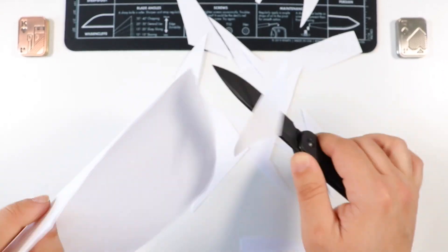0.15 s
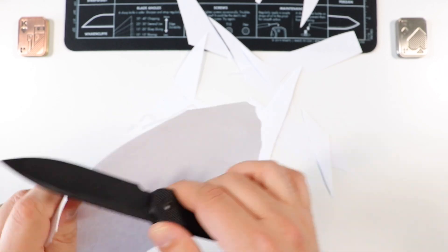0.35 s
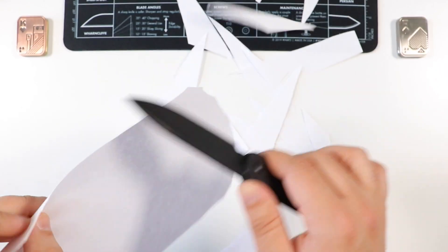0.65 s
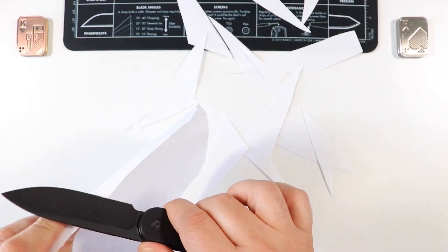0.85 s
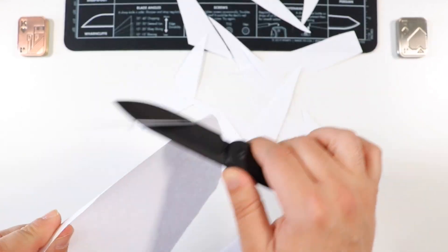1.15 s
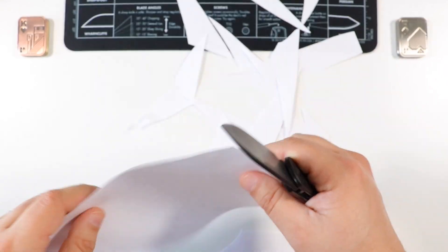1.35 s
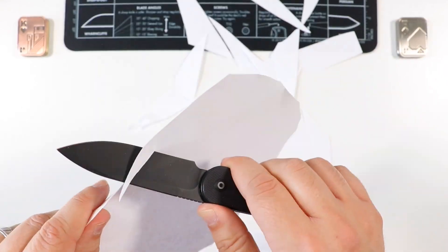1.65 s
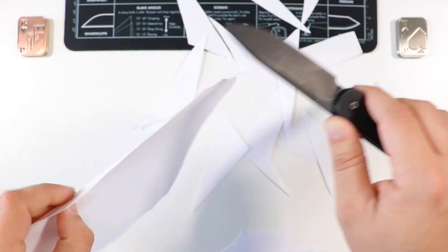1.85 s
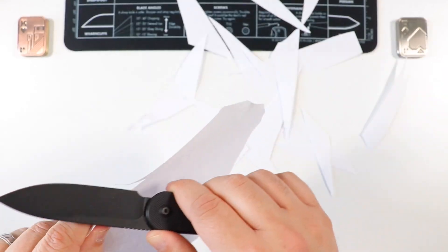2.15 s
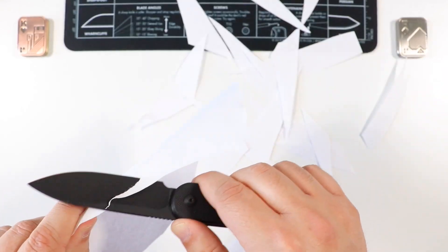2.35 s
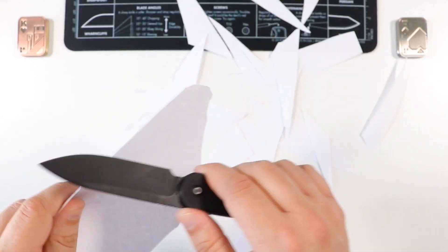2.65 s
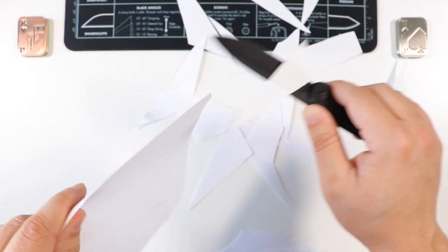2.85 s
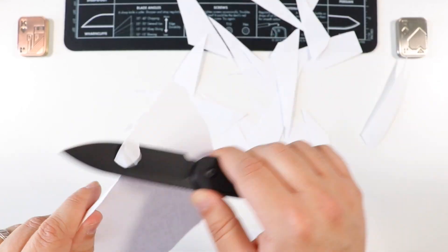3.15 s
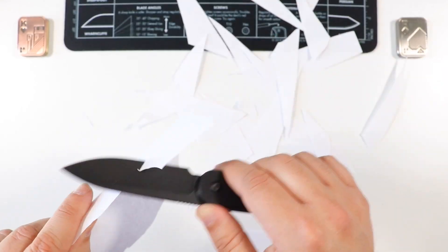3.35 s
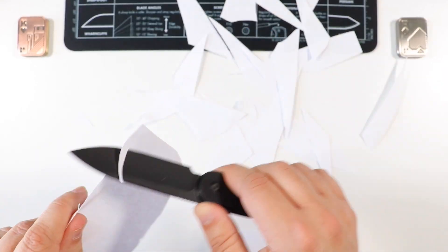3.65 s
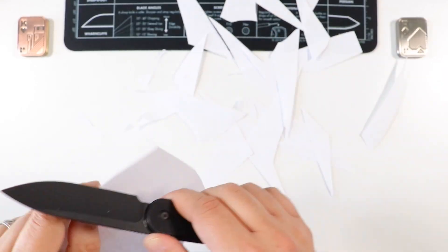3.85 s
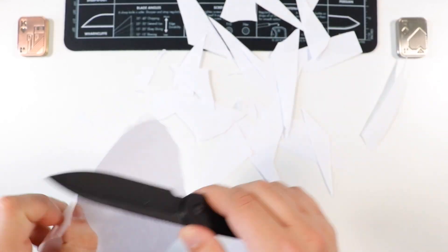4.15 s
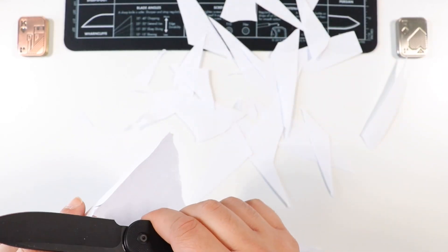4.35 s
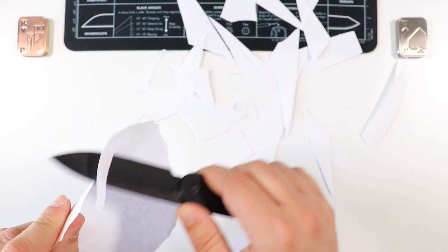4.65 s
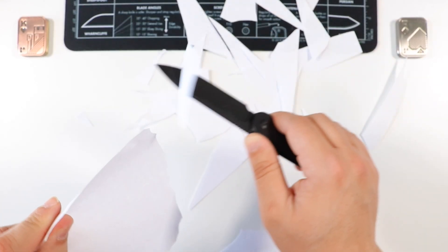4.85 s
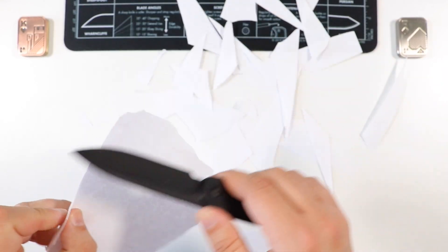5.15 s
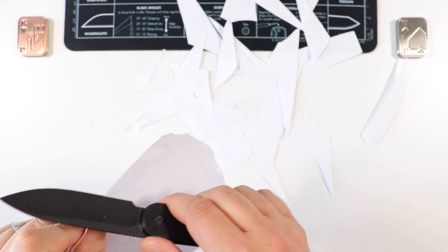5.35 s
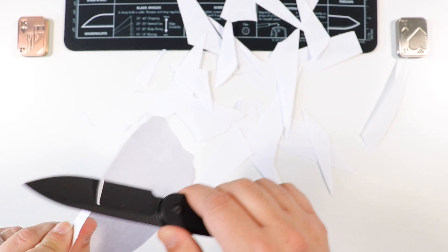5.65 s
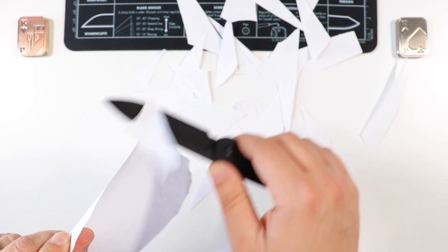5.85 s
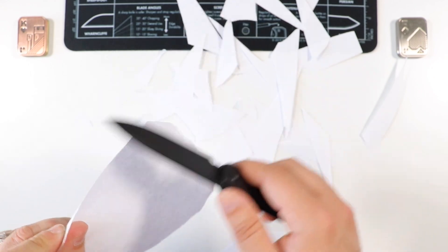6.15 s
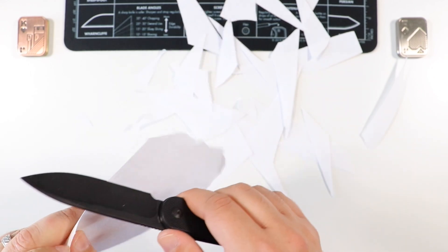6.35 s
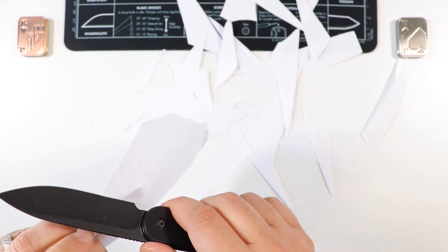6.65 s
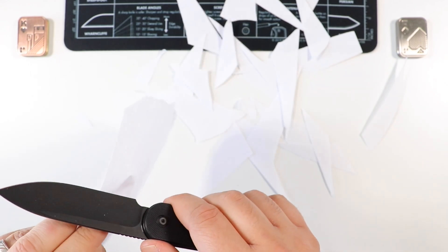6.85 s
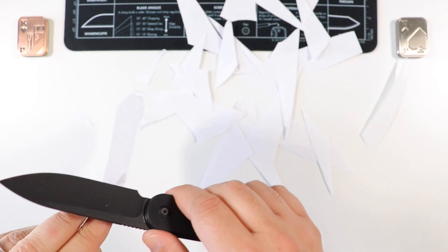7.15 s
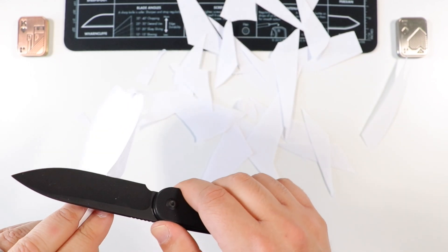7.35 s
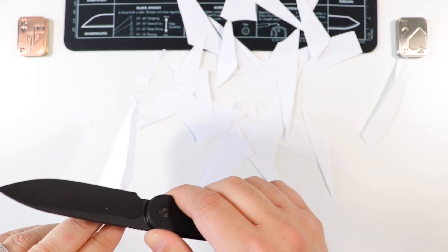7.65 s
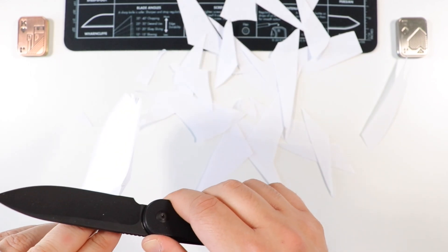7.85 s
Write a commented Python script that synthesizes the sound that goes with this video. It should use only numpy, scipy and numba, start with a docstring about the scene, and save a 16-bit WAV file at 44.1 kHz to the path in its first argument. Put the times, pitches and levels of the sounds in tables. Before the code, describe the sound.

Close, dry rasps of a knife blade cutting paper again and again, while the hand-held sheet rustles and snaps between strokes.

```python
"""A knife is drawn again and again through a sheet of paper held over a table, close under a microphone.
Over the hum of a quiet room, short cuts follow one another for four seconds: parting fibres crackle and
ring the sheet, which rustles while creases snap and hands thump softly on the table.
The two longest, loudest cuts come at 4.5 s and 5.5 s, each ending in a burst. The paper then only
rustles and snaps, until a few lighter cuts begin at 7.1 s."""
import sys
import numpy as np
from scipy import signal
from scipy.fft import rfft, irfft
from scipy.io import wavfile
from scipy.ndimage import uniform_filter1d
from numba import njit

SR = 44100
rng = np.random.default_rng(int(sys.argv[2]) if len(sys.argv) > 2 else 0)


def inscribe(sig):
    """Save sig as 16-bit PCM at rate SR to the path in sys.argv[1].

    A 1-D sig is mono; a 2-D sig holds one channel per row.
    Samples are clipped to [-1, 1] before scaling.
    """
    pcm = np.round(np.clip(np.atleast_2d(sig).T, -1, 1) * 32767)
    wavfile.write(sys.argv[1], SR, pcm.astype(np.int16))


N = 353152

# Resonance bands of the paper: f/Hz, bandwidth/Hz, level/dB
FLAT_MODES = [(2240, 760, -3.5), (2970, 930, -4), (3980, 1150, -3.5)]  # flat part of the sheet: a rasp
CURVED_MODES = [(900, 490, -0.5), (1257, 406, 4), (1595, 440, 4.5)]  # curved part: a hollow ring
EDGE_MODES = [(5300, 1120, -3), (6480, 1240, 0.5), (7380, 1900, -4.5)]  # cut edge: a hiss
FIZZ_BANDS = [(10300, 5900, 0), (12700, 3700, -3), (15200, 1480, -19)]  # finest fibres: a fizz
AIR_MODES = [(155, 124, -15), (229, 75, -11), (362.7, 41.6, 0.5), (528.5, 40, 1.5), (668, 180, 2.5)]  # air between sheet and table: a low flap


def undb(db):
    """Amplitude ratio of a level; undb(2 * db) is the power ratio."""
    return 10 ** (np.asarray(db) / 20)


def unit(x):
    """Normalisation to rms 1."""
    return x / np.sqrt(np.mean(x ** 2))


def wander(rate_hz):
    """Slow random modulation: Gaussian steps smoothed twice, with a spread near 1."""
    hold = int(SR / rate_hz)
    steps = np.repeat(rng.standard_normal(N // hold + 1), hold)
    return 1.146 * uniform_filter1d(uniform_filter1d(steps, hold), hold)[:N]


@njit
def resonator(x, hz, width_hz):
    """Second-order resonance: a state-variable band-pass with gain 1 at its moving centre."""
    y, band_state, low_state = np.empty(len(x)), 0., 0.
    for i in range(len(x)):
        g, damping = np.tan(np.pi * hz[i] / SR), width_hz / hz[i]
        band = (band_state + g * (x[i] - low_state)) / (1 + g * (g + damping))
        band_state = 2 * band - band_state
        low_state += 2 * g * band
        y[i] = damping * band
    return y


def ring(force, modes, drift, flicker_db):
    """Modal superposition: resonances wander in frequency and strength as the sheet bends."""
    out = 0
    for hz, width_hz, db in modes:
        centre_hz = np.clip(hz * (1 + drift * wander(25)), 20, .45 * SR)
        patch = force * rng.choice([-1., 1.], N)  # random signs make the modes incoherent
        stage_hz = 1.63 * width_hz  # two stages in series narrow the band again
        band = resonator(resonator(patch, centre_hz, stage_hz), centre_hz, stage_hz)
        out = out + undb(db + flicker_db * wander(60)) * band / np.sqrt(width_hz)
    return out


def room_hum():
    """Spectral shaping turns white noise into the hum and hiss of the room; its level flickers gently."""
    # Background spectrum: f/Hz, relative spectrum level/dB
    spectrum = [(59, -31), (100, -9), (176, -6), (330, -8.5), (733, -16.5), (3390, -23.5), (10100, -28),
                (13800, -32), (15000, -27)]
    hz, db = np.transpose(spectrum)
    f = np.arange(N // 2 + 1) * SR / N + 1
    gain = undb(np.interp(np.log(f), np.log(hz), db))
    noise = unit(irfft(rfft(rng.standard_normal(N)) * gain, N))
    return noise * undb(-59 + 0.76 * wander(5))


def rumble_and_thumps():
    """Amplitude modulation of deep noise: a slow rumble, plus a Gaussian pulse of power for each thump."""
    # Course of the rumble: t/s, level/dB
    rumble = [(0.0, -65), (1.6, -70), (2.6, -70.5), (4.7, -67), (5.3, -62), (5.8, -75), (6.1, -62),
              (8.01, -62.5)]
    # Hands meeting the table: t/s, peak level/dB
    thumps = [(.13, -61), (.58, -60), (1.11, -66), (1.31, -57), (2.56, -62), (2.97, -69), (3.32, -56),
              (4.5, -58), (5.06, -56), (5.4, -59), (5.6, -61), (6.29, -55), (6.42, -57), (7.36, -63)]
    rise_s, fall_s = 0.045, 0.046
    t = np.arange(N) / SR
    power = undb(2 * np.interp(t, *np.transpose(rumble)))
    for peak_s, db in thumps:
        from_peak = np.maximum((peak_s - t) / rise_s, (t - peak_s) / fall_s)
        power += undb(2 * db) * np.exp(-from_peak ** 2)
    deep = resonator(rng.standard_normal(N), hz=np.full(N, 80.), width_hz=80.)
    deep = signal.sosfilt(signal.butter(2, 120, fs=SR, output="sos"), deep)
    return unit(deep) * np.sqrt(power)


def stroke_levels():
    """Incoherent strokes add in power: returns their level, then curved, edge, fizz, air shares in dB."""
    # Both tables: start t/s, rise/s, hold/s, fall/s (per 30 dB or so), level/dB, swell over the hold/dB,
    # curved share/dB, edge share/dB, air share/dB
    cuts = [(.034, 0.014, 0.1, 0.039, -29, -1, -7.5, -2, -11.5),
            (.42, 0.018, 0.16, 0.033, -31.5, 4, -5.5, -4.5, -8.5),
            (.848, 0.011, 0.014, 0.025, -36, 2, -11, -2.5, -9),
            (1.05, 0.017, .13, 0.093, -30.5, 2.5, -4.5, -6, -12.5),
            (1.555, 0.026, .03, 0.034, -30.5, 2, -4.5, -5.5, -12.5),
            (1.632, .028, .005, 0.078, -25.5, -1.5, -7, -5.5, -13),
            (1.69, 0.032, 0.024, 0.039, -27, -3.5, -5.5, -3.5, -13),
            (1.755, 0.018, 0.045, 0.053, -29.5, -1.5, -6, -4.5, -8),
            (2.02, 0.036, 0.071, 0.038, -35, 5.5, -3.5, -4.5, -16.5),
            (2.37, 0.029, 0.13, 0.065, -29.5, 1.5, -5, -7, -17.5),
            (2.735, 0.052, 0.056, 0.1, -30, 3, -5, -5.5, -18),
            (3.07, 0.081, 0.066, 0.028, -29.5, 0.5, -5.5, -3.5, -13.5),
            (3.33, .06, 0.046, 0.046, -28.5, -2.5, -8.5, -3.5, -19),
            (3.63, 0.016, 0.051, 0.11, -33.5, 6, -5.5, -4, -11),
            (3.71, 0.0425, .004, .02, -26.5, 0, -3, -5, -20),
            (3.975, 0.027, 0.068, 0.1, -30, 1, -7.5, -3, -15),
            (4.505, 0.024, 0.23, 0.063, -21, -2.5, -8.5, -3, -16),
            (5.5, 0.093, 0.23, .05, -23, 2, -6.5, -2, -16.5),
            (7.135, 0.011, 0.052, 0.072, -32.5, 1.5, -1.5, -8, -9),
            (7.272, 0.019, 0.025, 0.081, -30.5, 2, -4, -5, -7),
            (7.87, 0.028, 0.06, .09, -32.5, 1, -7, -2, -11),
            (7.96, .04, .02, .05, -31.5, 4, -5.5, -3.5, -8.5)]  # the blade drawn through the sheet
    # Rustles of the sheet, plus short loud bursts at snaps and at the ends of the long cuts
    rustles = [(-.01, 0.012, .008, 0.026, -36, -4.5, 2, -17, -2),
               (.15, 0.024, 0.037, 0.1, -34, -4, -3, -9.5, -4.5),
               (.265, 0.0091, .004, 0.052, -33.5, 1.5, -0.5, -13.5, -5.5),
               (.3, 0.016, 0.016, 0.13, -48.5, -0.5, -10, -2, -6),
               (.395, .012, .01, .03, -50, 0, -2, -14, 1),
               (.6, 0.025, 0.048, .06, -38.5, -2.5, -3.5, -6, -4.5),
               (.68, 0.018, 0.086, 0.15, -42.5, 1.5, -4.5, -5.5, -5.5),
               (.9, .02, 0.091, .02, -43, 8, -3.5, -6.5, -9), (1.24, .015, .015, .03, -44, -1, -4, -8, 0),
               (1.297, 0.028, .004, 0.047, -27, 0, -7.5, -22, -11),
               (1.384, .015, .03, 0.029, -34, -1, -4, -9, -4.5),
               (1.525, 0.018, 0.023, .03, -51, 2, -9, -9, -7),
               (1.85, 0.022, 0.019, 0.14, -41.5, -1.5, -5, -4.5, -6),
               (1.92, 0.015, 0.038, 0.12, -42, 2, -4.5, -9.5, -5),
               (2.15, .013, 0.025, .1, -42, -0.5, -6, -5, -13),
               (2.2, 0.024, 0.023, .04, -44, 6, -3, -7.5, -9.5),
               (2.26, .012, .08, .035, -43.5, 5, -2.5, -8, -13),
               (2.54, 0.016, 0.068, 0.16, -41.5, -3, -8.5, -4.5, -3.5),
               (2.635, 0.01, 0.046, 0.033, -42.5, -4, -3.5, -6.5, -4.5),
               (2.87, 0.034, .04, .04, -43.5, -1.5, -4, -2.5, -7),
               (2.94, 0.021, 0.033, 0.041, -40.5, 4, -2.5, -8, -6),
               (3.25, 0.018, .004, 0.15, -40, -4, -2.5, -15, -2.5),
               (3.325, .015, .03, .04, -39.5, 1, -4, -8, -14),
               (3.45, 0.022, .13, 0.023, -41.5, -5, -5.5, -6, -5.5),
               (3.765, 0.017, 0.043, 0.066, -44, -3.5, -6.5, -4.5, -3.5),
               (3.83, 0.021, 0.049, .025, -45, 0, -4.5, -6, -1.5),
               (3.93, 0.039, .002, .016, -36, -2, -4.5, -10, -1.5),
               (4.165, .03, 0.047, .08, -41.5, -4, -4.5, -5, -5),
               (4.255, .017, 0.0032, 0.042, -44, 0, -4, -23, 3.5),
               (4.28, 0.013, 0.066, .02, -37.5, -8.5, -6.5, -3.5, -18),
               (4.37, .01, 0.051, .05, -59, 1, -2, -9, -3), (4.44, .007, 0.063, .03, -47, 9, -3.5, -5, -11),
               (4.506, 0.0022, 0.0044, 0.019, -16, -4, 0, -14, -8.5),
               (4.72, 0.039, 0.0087, 0.036, -21, -1, -4, -6.5, -18),
               (4.805, 0.013, 0.013, 0.25, -31, -3.5, -5, -7.5, -6.5),
               (4.93, .028, 0.06, 0.29, -40.5, 4, -8, -3, -7),
               (5.175, 0.025, 0.11, 0.093, -42.5, 2.5, -7.5, -1, -3.5),
               (5.345, 0.016, .004, 0.24, -40.5, 0, -2, -8, -8),
               (5.485, 0.034, .04, .05, -46, 0, -4, -0.5, -12),
               (5.83, 0.03, 0.011, .04, -23, 2.5, -3.5, -7, -12),
               (5.905, 0.016, 0.043, 0.38, -30, -9, -6, -11.5, -3),
               (6.13, 0.015, 0.039, 0.12, -47.5, 0, -6, -0.5, -11),
               (6.185, 0.024, .12, 0.054, -43.5, 0.5, -8, -1, 1.5),
               (6.335, 0.016, 0.053, .03, -43.5, -3, -3, 1, 5.5),
               (6.404, 0.0057, 0.0088, 0.054, -24, -2.5, -2.5, -15, -3.5),
               (6.425, 0.0074, 0.013, 0.064, -25, -2, -2.5, -17, -6.5),
               (6.45, .015, 0.085, .11, -40, 0, -5, -3.5, -11),
               (6.585, 0.019, .12, 0.22, -45, -1.5, -4, -8, 0),
               (6.77, 0.024, 0.073, 0.2, -44, -3, -4.5, -8, -2.5),
               (6.925, 0.0099, .065, 0.06, -49.5, 1, -7, -4, -6.5),
               (7.02, .01, 0.094, .05, -58.5, -3.5, -7, -13, 1),
               (7.23, .015, 0.053, .05, -43.5, 2, -4, -8, -9),
               (7.35, 0.013, 0.083, .2, -45.5, -7, -5.5, -4.5, -8),
               (7.572, 0.0071, .004, 0.11, -39.5, -1, -3, -11, -9.5),
               (7.64, 0.0074, .012, .45, -50.5, -8, -2, -11, -10),
               (7.75, .015, .065, .05, -60, -4, -1, -13, -5),
               (7.825, 0.0098, .002, .036, -52, 1, -2, -9, -5)]
    # Drift of the finest treble: t/s, level/dB
    fizz_drift = [(0.0, 0.5), (1.0, 0), (2.0, 0), (3.0, -1), (3.7, 1.5), (4.6, -1.5), (5.7, -0.5), (6.7, 0),
                  (7.1, 2), (7.6, 5.5), (8.01, 2)]
    depth_db, rounding = 30, 1.136  # an exponent over 1 rounds the slopes near full level
    t = np.arange(N) / SR
    drift_db = np.interp(t, *np.transpose(fizz_drift))
    power = np.full((5, N), 1e-12)
    for strokes, fizz_re_edge_db, is_cut in ((cuts, -7.5, True), (rustles, -6.5, False)):
        for start, rise, hold, fall, db, swell_db, curved_db, edge_db, air_db in strokes:
            knots = start + np.cumsum([0, rise, hold, 2 * fall])
            span = slice(*np.searchsorted(t, knots[[0, -1]]))
            fade_db = depth_db * np.interp(t[span], knots, [1.026, 0.0056, 0.01, 2.1]) ** rounding
            progress = np.interp(t[span], knots[1:3], [0, 1])
            level = db + swell_db * progress - fade_db
            # The sound dulls as the offcut hangs freer, and as the stroke fades.
            freed = is_cut * (progress - .5)
            curved = curved_db + 1.5 * freed + 0.058 * fade_db
            edge = edge_db - freed - 0.093 * fade_db
            fizz = edge_db - freed + fizz_re_edge_db + drift_db[span] - 0.033 * fade_db
            air = air_db + freed + 0.3 * fade_db
            power[0, span] += undb(2 * level)
            power[1:, span] += undb(2 * (level + [curved, edge, fizz, air]))
    return [10 * np.log10(power[0]), *(10 * np.log10(power[1:] / power[0]))]


def fibre_crackle(scatter_db, judder_db):
    """Fracture noise: fibres part in dense clicks of uneven size, modulated by the judder of the blade."""
    sizes = undb(scatter_db * np.minimum(rng.exponential(size=N), 4.5))
    clicks = sizes * rng.standard_normal(N)
    return unit(clicks * undb(judder_db * wander(350)))


def rustles_and_cuts():
    """Forced vibration: one crackle drives sheet, edge and trapped air in the shares of each stroke."""
    level_db, curved_db, edge_db, fizz_db, air_db = stroke_levels()
    crackle = fibre_crackle(scatter_db=2.0, judder_db=1.3)
    # The flat part takes, within limits, the power that the others leave.
    flat_power = 1 - sum(undb(2 * share_db) for share_db in (curved_db, edge_db, air_db - 3))
    out = np.sqrt(np.clip(flat_power, .08, .45)) * unit(ring(crackle, FLAT_MODES, 0.029, flicker_db=2.5))
    out += undb(curved_db) * unit(ring(crackle, CURVED_MODES, drift=0.011, flicker_db=2.5))
    out += undb(edge_db) * unit(ring(crackle, EDGE_MODES, drift=0.064, flicker_db=3.0))
    out += undb(fizz_db) * unit(ring(crackle, FIZZ_BANDS, drift=0.047, flicker_db=2.8))
    out += undb(air_db) * unit(ring(crackle, AIR_MODES, drift=0.0098, flicker_db=0.5))
    return undb(level_db) * out


def shifting_comb(direct, lag_s=0.000899, share=0.24):
    """Interference with a delayed copy gives the paper's hiss a faint, wandering comb colouring."""
    samples = np.arange(N)
    lag = lag_s * SR * np.exp(0.26 * wander(9))
    delayed = np.interp(samples - lag, samples, direct)
    return (direct + share * delayed) / np.hypot(1, share)


def reverberation(source, t60_s=0.18):
    """Diffuse reflections from table and walls: convolution with exponentially decaying noise."""
    t = np.arange(SR // 2) / SR
    tail = rng.standard_normal(len(t)) * np.exp(-np.log(1000) * t / t60_s) * (t > .004)
    tail = signal.lfilter([1], [1, -.4], tail)  # walls absorb some treble
    return signal.fftconvolve(source, tail / np.sqrt(np.sum(tail ** 2)))[:N]


def crease_snaps():
    """Impulsive excitation: a sharp crack and a weaker shiver die away in the paper's resonances."""
    # Creases snapping and taps of the blade: t/s, drive level/dB, treble re drive/dB, air re drive/dB
    snaps = [(0.27, -41, -24, -23), (0.307, -36, -18, -8), (0.611, -18.5, -29, -18), (0.768, -25, -27, -11),
             (0.8, -33, -26, -20), (1.308, -34, -12, -1.5), (1.313, -22.5, -20, -5.5),
             (1.324, -15.5, -13.5, -28), (1.395, -36, -11, -19), (1.507, -47, -27, -5),
             (1.538, -36, -20, -15), (1.932, -28.5, -22, -6.5), (1.97, -27.5, -4.5, -17),
             (2.016, -23.5, -19, -15.5), (2.59, -27.5, -12, -25), (2.643, -29.5, 0, -19),
             (3.32, -19.5, -5, -18.5), (4.087, -18, -30, -15), (4.301, -24, -9, -16),
             (4.36, -28, -26.5, -28), (4.508, -13.5, -16, -18), (4.807, -17.5, -11.5, -17.5),
             (4.952, -28, -23, -29), (5.498, -44.5, -14, 4), (5.513, -38, -5, -18.5), (5.531, -43, 7, -17),
             (5.909, -14.5, -10.5, -16), (6.157, -31, -18, -19), (6.321, -25, -37, -2),
             (6.409, -11, -23, -13.5), (6.432, -13, -18, -25), (6.441, -26, -15.5, -19.5),
             (7.142, -35, -13, -8.5), (7.175, -27, -16, -13), (7.197, -25.5, -26, -15), (7.39, -45, 6, -16),
             (7.517, -33, -17, -30), (7.57, -25, -8, -24), (7.58, -31, -10, -25), (7.756, -35.5, -23, -24),
             (7.8, -51, -18, -9), (7.832, -46, -16, -20), (7.861, -38.5, -12, -7)]
    crack_decay_s, shiver_db, shiver_t60_s = 0.00052, -8.5, 0.051
    size = SR // 4
    t = np.arange(size) / SR
    drives = np.zeros((3, N + size))
    for start_s, db, treble_db, air_db in snaps:
        noise = rng.standard_normal(size)
        crack = np.sign(noise) * np.exp(-t / crack_decay_s)
        shiver = noise * undb(shiver_db) * np.exp(-np.log(1000) * t / shiver_t60_s)
        i = int(start_s * SR)
        drives[:, i:i + size] += undb([[db], [db + treble_db], [db + air_db]]) * (crack + shiver)
    sheet_drive, treble_drive, air_drive = drives[:, :N]
    sheet = ring(sheet_drive, CURVED_MODES + FLAT_MODES[:2], drift=0.046, flicker_db=-2.3)
    edge = ring(treble_drive, FLAT_MODES[2:] + EDGE_MODES, drift=0.0087, flicker_db=-2.0)
    fizz = ring(treble_drive, FIZZ_BANDS, drift=0.012, flicker_db=7.5)
    air = ring(air_drive, AIR_MODES, drift=0.0067, flicker_db=5.5)
    return undb(32.5) * sheet + undb(44) * edge + undb(33) * fizz + undb(42) * air


def scene():
    """Superposition of the paper, its reverberation and the background, in one channel."""
    paper = shifting_comb(rustles_and_cuts()) + crease_snaps()
    return (paper + undb(-17) * reverberation(paper) + room_hum() + rumble_and_thumps())[None]


def record(dry):
    """Frequency response of the microphone: a shallow dip in the upper treble, then a steep low-pass."""
    dip_hz, dip_width_hz, dip_share, cutoff_hz = 9730., 3500., 0.2, 15750
    dipped = dry[0] - dip_share * resonator(dry[0], np.full(N, dip_hz), dip_width_hz)
    low_pass = signal.ellip(12, .5, 70, cutoff_hz, fs=SR, output="sos")
    return signal.sosfilt(low_pass, dipped)[None]


dry = scene()
out = record(dry)
inscribe(out)
```